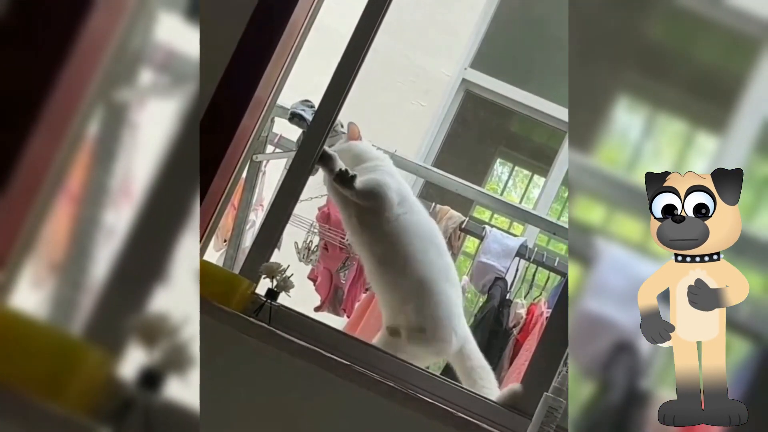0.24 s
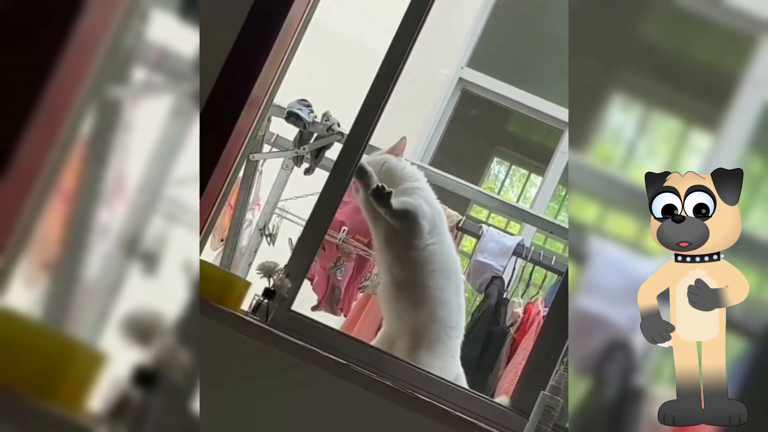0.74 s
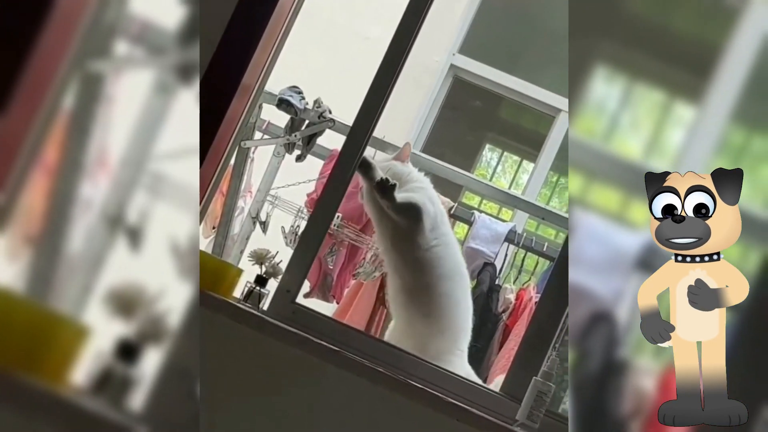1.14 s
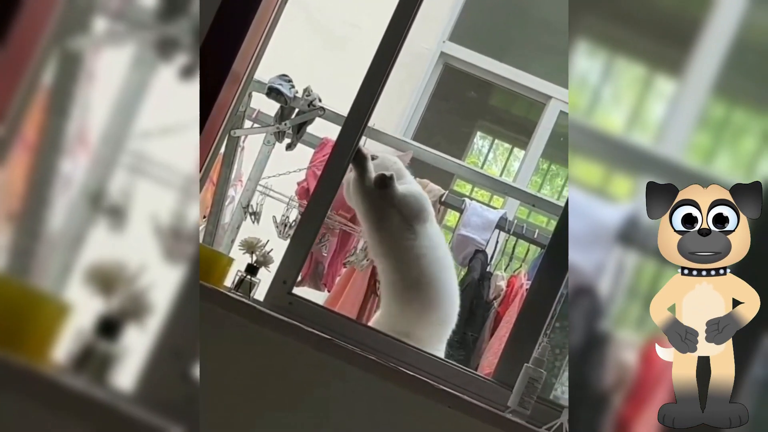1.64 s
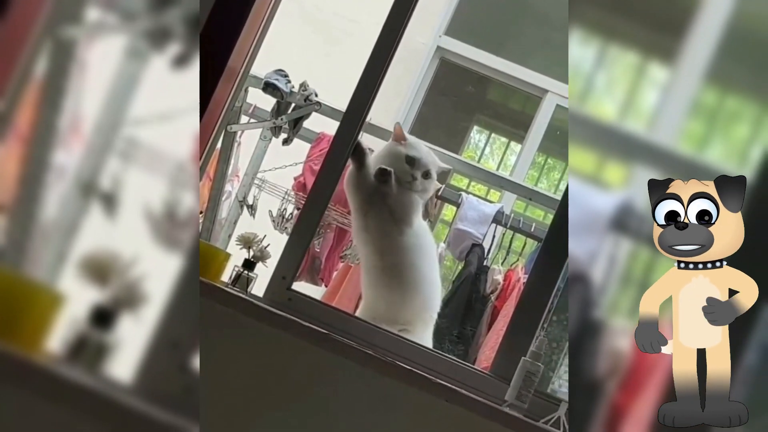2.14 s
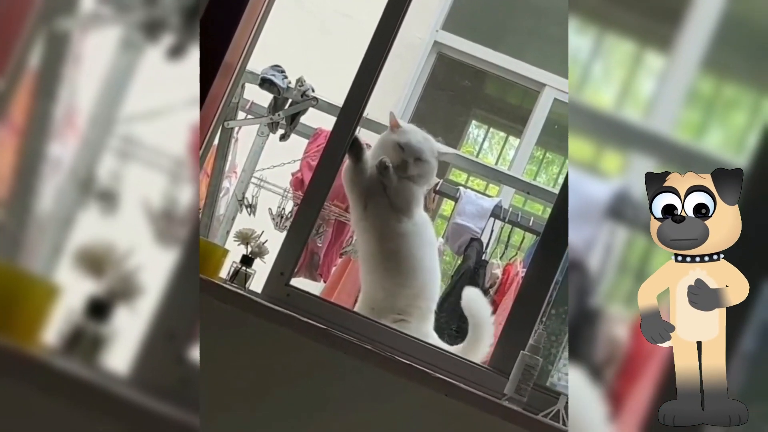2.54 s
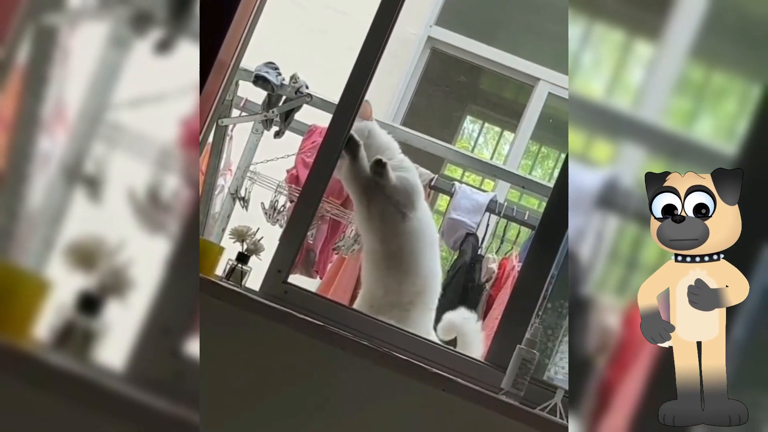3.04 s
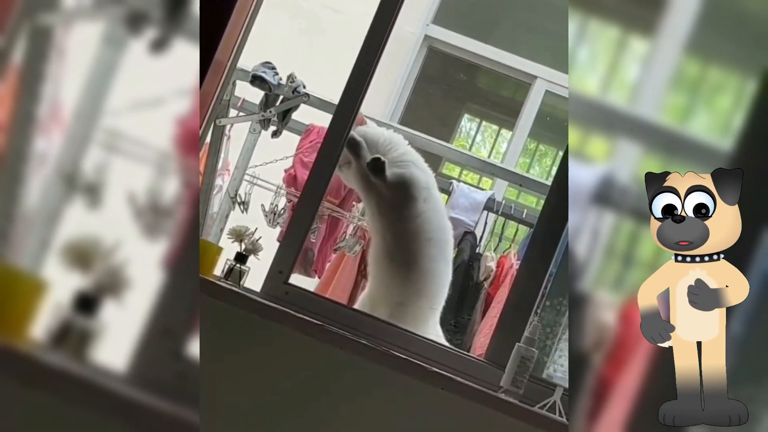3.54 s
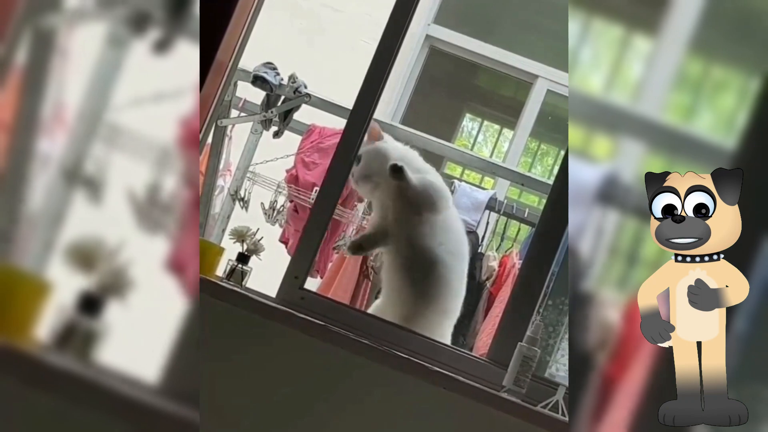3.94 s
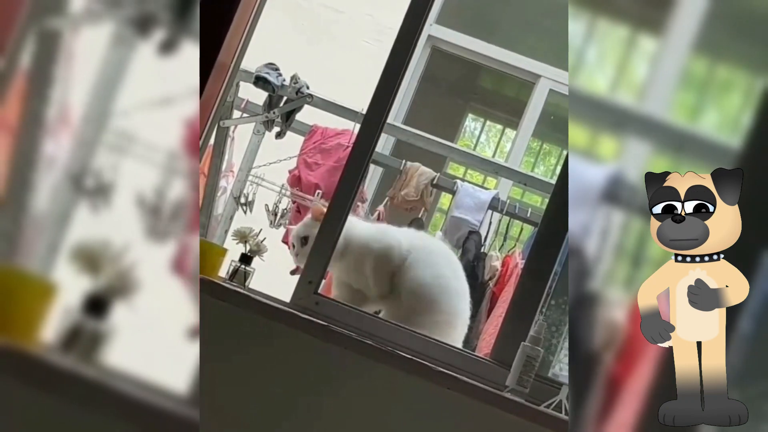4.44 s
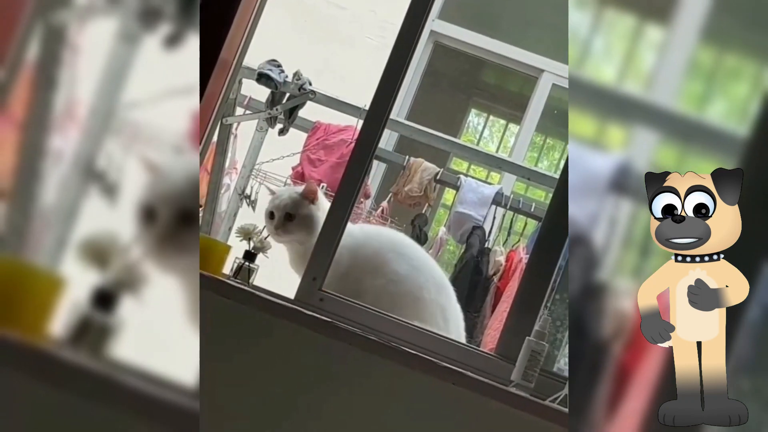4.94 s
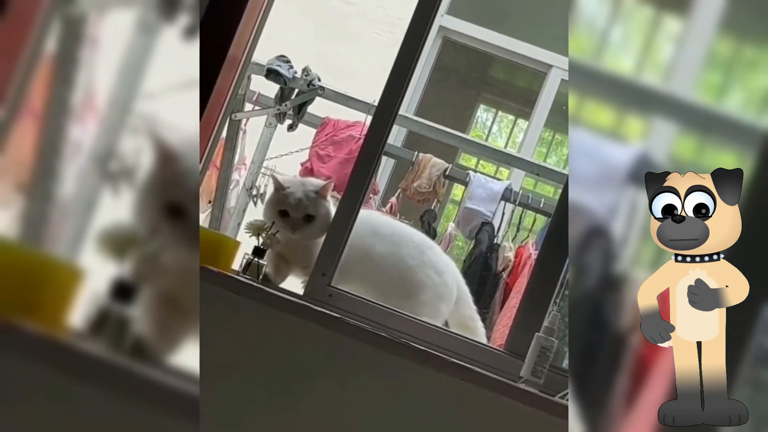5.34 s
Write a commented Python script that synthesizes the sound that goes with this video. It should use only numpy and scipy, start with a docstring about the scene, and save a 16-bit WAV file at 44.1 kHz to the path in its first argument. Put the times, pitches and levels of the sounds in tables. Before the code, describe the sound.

A cat paws at a sliding glass window in a quiet room. The sash scrapes in its track and knocks several times against the metal frame, each rattle followed by a dull thud and a low hum from the panes. Two short scrapes and some faint taps follow. Then comes one loud bang, a hard scrape and another knock. The glass hums away under a last soft rub, heard from nearby indoors.

```python
"""A cat bats at a sliding glass window in a quiet room. In the first second the sash scrapes in its track
and knocks on the metal frame: each knock starts bright, then the sill thuds and the panes swell into a hum.
Two short scrapes follow, then faint taps from 2.2 to 3.5 s. At 3.9 s comes the big bang, then a hard scrape
and one more knock. The panes hum on, and a last soft rub ends the scene."""
import sys
import numpy as np
from scipy import signal
from scipy.fft import rfft, irfft, next_fast_len
from scipy.io import wavfile
from scipy.ndimage import uniform_filter1d, minimum_filter1d, map_coordinates

SR = 44100
rng = np.random.default_rng(int(sys.argv[2]) if len(sys.argv) > 2 else 0)


def dump_mix(stems):
    """Bounce the given channels to the path in sys.argv[1] as a 16-bit WAV at rate SR."""
    frames = np.atleast_2d(stems).T  # one column per channel
    limited = np.clip(frames, -1, 1)  # hard clip at full scale
    pcm = np.round(limited * 32767).astype(np.int16)
    wavfile.write(sys.argv[1], SR, pcm)


N = 246519


def amp(db):
    """Gain of a level in dB."""
    return 10 ** (np.asarray(db) / 20)


def unit(x):
    """x at rms 1."""
    return x / np.sqrt(np.mean(np.abs(x) ** 2) + 1e-20)


def along(points, hz):
    """Read a breakpoint curve on a log frequency axis."""
    f, v = np.transpose(points)
    return np.interp(np.log(hz + 1), np.log(f + 1), v)


def wobble(rate, size):
    """Smooth random modulation, rate knots a second."""
    return map_coordinates(rng.standard_normal(int(size * rate / SR) + 4), [np.arange(size) * rate / SR])


def swell(t, rise):
    """Soft attack with time constant rise."""
    return (1 - np.exp(-t / max(rise, .001))) ** 2


def filtered(x, response):
    """x through a complex frequency response."""
    m = next_fast_len(len(x) + SR // 4)
    return irfft(rfft(x, m) * response(np.fft.rfftfreq(m, 1 / SR)), m)[:len(x)]


def coloured(x, eq):
    """x through an EQ curve, at rms 1."""
    return unit(filtered(x, lambda f: amp(along(eq, f))))


def grit(size, flutter_db, flutter_rate):
    """Noise of tiny uneven contacts, with a slower flutter in level."""
    grains = unit(rng.standard_normal(size) * amp(.5 * wobble(900, size)))
    return grains * amp(flutter_db * wobble(flutter_rate, size))


# EQ of the room's air: f/Hz, level/dB
AIR_EQ = [(21, -17), (35, 1.5), (72, 4), (343, -11.5), (525, -12), (764, -15.5), (1170, -17.5),
          (1500, -19.5), (4100, -26.5), (4760, -36), (6770, -29), (12400, -35), (14000, -43)]


def room_tone():
    """The bed: gently wavering air, a faint rustle coloured like the scrape, and a 43 Hz drone."""
    air = coloured(rng.standard_normal(N), AIR_EQ)
    rustle = coloured(rng.standard_normal(N), RUB_EQ) * amp(2.8 * wobble(37, N))
    drone = amp(2.1 * wobble(3.14, N)) * np.sin(2 * np.pi * 43 * np.arange(N) / SR + wobble(1.4, N))
    air *= amp(1.6 * wobble(5.8, N))
    return amp(-48.5) * (air + amp(-12.5) * rustle + amp(-5) * drone)


# Reverb time of the room: f/Hz, t60/s
ROOM_DECAY = [(150, 4.3), (500, 0.99), (2000, 0.54), (8000, 0.57)]


def room_tail(size):
    """The room's impulse response: a noise tail whose lows hang on longest."""
    hz, t, z = signal.stft(rng.standard_normal(size), SR, nperseg=256)
    decay = amp(-60 * t / along(ROOM_DECAY, hz)[:, None])
    tail = signal.istft(z * decay, SR, nperseg=256)[1][:size]
    return tail / np.linalg.norm(tail)


# Modes of the metal frame: f/Hz, bandwidth/Hz, level/dB
FRAME_MODES = [(785, 135, 3.5), (971, 92, -2.5), (1200, 320, -10), (1487, 120, 4), (1877, 260, -3),
               (2476, 280, 0), (2840, 350, -2), (3065, 360, -4.5), (3650, 246, -3), (4960, 1040, -9),
               (6880, 870, -5), (9200, 920, -16.5)]


def frame(f, scatter_db=0):
    """The frame as a resonator bank of alternating polarity; scatter_db varies the mix per contact."""
    scatter = scatter_db * rng.standard_normal(len(FRAME_MODES))
    return sum((-1) ** k * amp(db + scatter[k]) * 1j * f * width / (hz * hz - f * f + 1j * f * width)
               for k, (hz, width, db) in enumerate(FRAME_MODES))


# Strokes of sash and paws: t/s at full level, hold/s, level/dB, attack/(dB/s), release/(dB/s), tilt/(dB/oct)
RUB_STROKES = [(0, .2, -39.5, 150, 24, -4), (0.512, 0.31, -32.5, 168, 28, 3.5),
               (1.438, 0.021, -36.5, 159, 132, 2), (1.941, 0.0076, -45.5, 127.5, 128, 1.5),
               (2.486, 0.39, -53.5, 11, 12, 1), (3.173, 0.009, -45.5, 87, 140, 0),
               (3.758, 0.048, -34, 100, 79, 2.5), (4.07, 0.027, -23, 81, 61.5, -0.5),
               (4.363, 0.033, -34, 65, 46.5, -4.5), (5.442, 0.14, -53.5, 147, 40, 3.5)]


def strokes(t):
    """Gain and tilt of the rubbing: each stroke builds, holds and fades; the loudest sets the colour."""
    start, hold, db, attack, release, tilt = np.transpose(RUB_STROKES)[..., None]
    power = amp(db - attack * np.maximum(start - t, 0) - release * np.maximum(t - start - hold, 0)) ** 2
    total = power.sum(axis=0)
    return np.sqrt(total), (power * tilt).sum(axis=0) / total


# EQ of the friction: f/Hz, level/dB
RUB_EQ = [(200, -5), (400, 6), (600, -7), (1000, 4.5), (2500, -0.5), (5000, -3), (7500, -8), (10700, -14),
          (14000, -36)]


def scrape():
    """Sash and paws rub: grit in shifting patches, partly through the frame, duller or brighter by stroke."""
    rub = grit(N, flutter_db=1.6, flutter_rate=60)
    rub = filtered(rub, lambda f: amp(along(RUB_EQ, f)) * (1 + .5 * np.abs(frame(f))))
    hz, t, z = signal.stft(rub, SR, nperseg=512)
    patches = uniform_filter1d(rng.standard_normal(z.shape), size=5, axis=0)
    patches_db = 2.2 * unit(uniform_filter1d(patches, size=9, axis=1))
    tilt_db = strokes(t)[1] * np.log2((hz[:, None] + 300) / 3000)
    rub = signal.istft(z * amp(tilt_db + patches_db), SR, nperseg=512)[1][:N]
    return strokes(np.arange(N) / SR)[0] * unit(rub)


# Modes of the glass: f/Hz, level/dB, attack/s (two time constants), t60/s, waver depth (0-1)
PANE_MODES = [(41.2, -9, 0.087, 4.6, 0.4), (70.8, -7.5, 0.087, 0.86, 0), (82.36, 2.5, 0.045, 1.05, 0.47),
              (103.8, -7, 0.023, 1.8, 0.8), (171.2, -1.5, 0.037, 2.11, 0.56),
              (200.4, -3, 0.039, 0.83, 0.53), (262, -8, 0.023, 1.83, 0.59),
              (314.5, -5.5, 0.011, 1.34, 0.63), (425.3, 2.5, 0.015, 0.52, 1), (480.4, -5, 0.0083, 0.63, 1),
              (567, -6.5, 0.04, 0.96, 0.4), (630, -25, .04, 0.26, .5)]


def pane_hum(t, push_hz, focus_db):
    """Pane modes swell, waver and die away; a mode one octave off the push loses focus_db."""
    out = np.zeros(len(t))
    for hz, db, attack, t60, waver in PANE_MODES:
        drift = unit(1 + waver * (wobble(16.68, len(t)) + 1j * wobble(15.66, len(t))))
        tone = (drift * np.exp(2j * np.pi * (hz * t + rng.random()))).imag
        level_db = db - focus_db * np.log2(hz / push_hz) ** 2
        out += amp(level_db - 60 * t / t60) * swell(t, attack / 2) ** 2 * tone
    return out


# EQ of the loose sash: f/Hz, level/dB
SASH_EQ = [(300, -14), (700, 4.5), (1500, 2.5), (4000, 2.5), (7000, -3), (10500, -6.5), (12000, -19),
           (14000, -30)]
# EQ of the wooden sill: f/Hz, level/dB
SILL_EQ = [(60, -23), (150, -1), (300, -0.5), (600, -4), (1200, -6), (2500, -40)]


def rattle(t, rise, t60, ring_hz, thud_db):
    """One hit with reverb: the frame rings near ring_hz, the loose sash chatters, the sill thuds late."""
    chatter = lambda: grit(len(t), flutter_db=3.2, flutter_rate=80)
    emphasis = lambda f: amp(-4 * np.log2((f + 1) / ring_hz) ** 2)
    ring = unit(filtered(chatter(), lambda f: emphasis(f) * frame(f, scatter_db=3)))
    sash = coloured(chatter(), SASH_EQ)
    sill = coloured(rng.standard_normal(len(t)), SILL_EQ)
    fade = amp(-60 * t / max(t60, .02))
    hit = swell(t, rise) * fade * (ring + amp(-5) * sash)
    hit += amp(thud_db) * sill * swell(t, 7 * rise) ** 2 * fade ** .57  # slower in, slower out
    return hit + amp(-8) * signal.fftconvolve(hit, room_tail(SR))[:len(t)]


# Soft shoves on the glass: t/s, hum level/dB, push f/Hz
PANE_SHOVES = [(0.302, -29, 416), (0.329, -29, 109), (.47, -29.5, 98), (.87, -42, 168.6),
               (1.04, -33.5, 109), (1.08, -35, 417), (1.199, -42, 65.4), (2.44, -42, 288),
               (3.529, -44, 590), (4.132, -41, 170), (4.26, -31, 233), (4.549, -33, 87),
               (5.0, -40.5, 171.5), (5.2, -44, 255)]
# Hits of sash on frame: t/s, rattle level/dB, rise/s, t60/s, ring f/Hz, thud re rattle/dB, hum level/dB
SASH_KNOCKS = [(-.07, -33, 0.0024, 0.14, 1200, 12, -23), (.249, -15, 0.0062, 0.28, 2800, -10, -30),
               (.454, -19, .007, 0.16, 2560, -23.5, -39), (.727, -16.5, 0.0098, 0.19, 3970, -13, -37),
               (1.038, -18.5, 0.0053, 0.24, 950, -3.5, -29), (2.194, -35.5, 0.0021, 0.028, 1770, -12, -55),
               (2.432, -39, 0.0041, 0.26, 3140, 4, -48.5), (2.589, -42.5, .0044, 0.13, 1500, -14, -60),
               (2.685, -37, 0.0018, 0.029, 1480, -11, -66), (2.885, -44, 0.0047, 0.12, 1596, -3, -68),
               (3.109, -43.5, 0.0052, 0.38, 1000, -33.5, -57.5), (3.483, -36, 0.0037, 0.22, 850, -1.5, -50),
               (3.911, -2, 0.0029, 0.23, 2370, -0.5, -7.5), (4.384, -10.5, 0.0066, 0.23, 3130, -4, -25)]


def knocks():
    """Every knock rattles the frame and then sets the panes humming; a shove moves the panes alone."""
    hum_lag_s = .035
    t = np.arange(3 * SR // 2) / SR
    voices = [(start, amp(db) * rattle(t, rise, t60, ring_hz, thud_db))
              for start, db, rise, t60, ring_hz, thud_db, _ in SASH_KNOCKS]
    voices += [(start + hum_lag_s, amp(hum_db) * pane_hum(t, push_hz=153, focus_db=4))
               for start, *_, hum_db in SASH_KNOCKS]
    voices += [(start, amp(hum_db) * pane_hum(t, push_hz, focus_db=51))
               for start, hum_db, push_hz in PANE_SHOVES]
    fade_out = np.cos(np.pi * t / 3)  # closes every tail by 1.5 s
    out = np.zeros(N + 3 * SR)
    for start, voice in voices:
        out[round((start + 1) * SR):][:len(t)] += voice * fade_out  # 1 s of pre-roll
    return out[SR:SR + N]


def scene():
    """All layers sit in the centre; a phase-scrambled copy widens only the treble."""
    wide_above_hz = 4300
    mid = knocks() + scrape() + room_tone()
    z = signal.stft(mid, SR, nperseg=256)[2]
    scrambled = signal.istft(z * np.exp(2j * np.pi * rng.random(z.shape)), SR, nperseg=256)[1][:N]
    side = amp(-6.5) * filtered(scrambled, lambda f: f > wide_above_hz)
    return np.array([mid + side, mid - side])


def record(dry):
    """Master chain: a limiter holds the big bang, then a high cut trims the top."""
    ceiling, high_cut_hz = .88, 14000
    safe_gain = np.minimum(1, ceiling / (np.abs(dry).max(axis=0) + 1e-9))
    gain = uniform_filter1d(minimum_filter1d(safe_gain, size=1201), size=1001)
    return np.array([filtered(x, lambda f: f < high_cut_hz) for x in dry * gain])


dry = scene()
out = record(dry)
dump_mix(out)
```